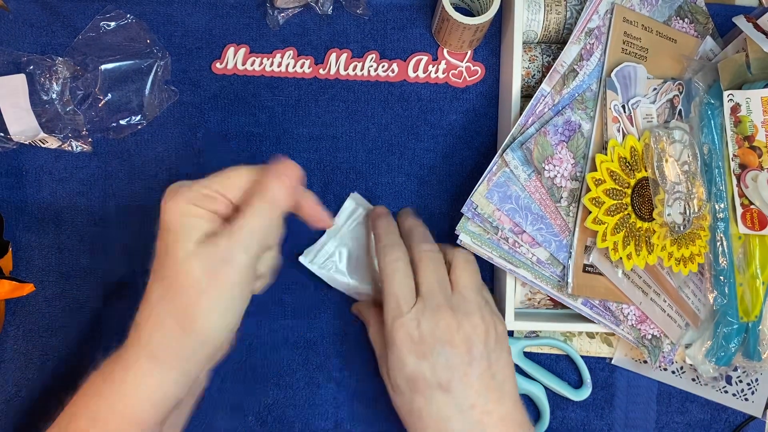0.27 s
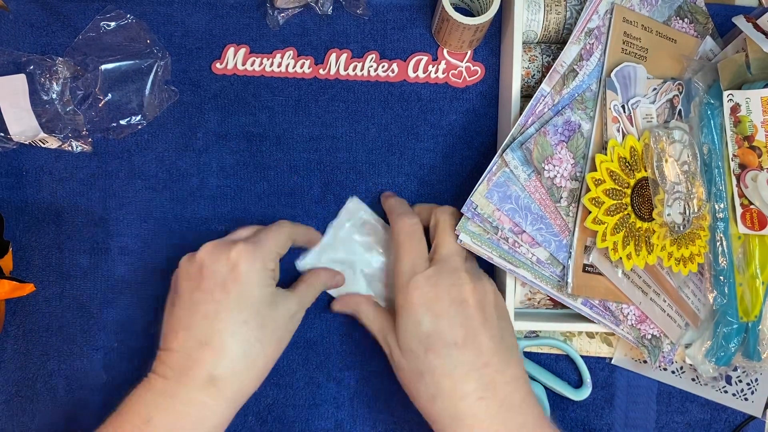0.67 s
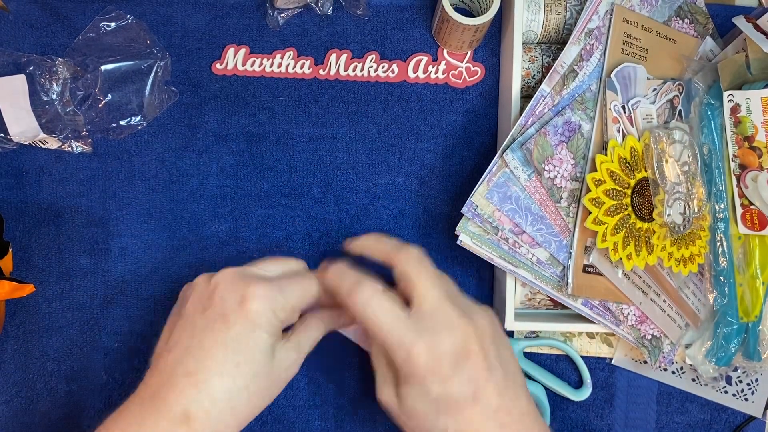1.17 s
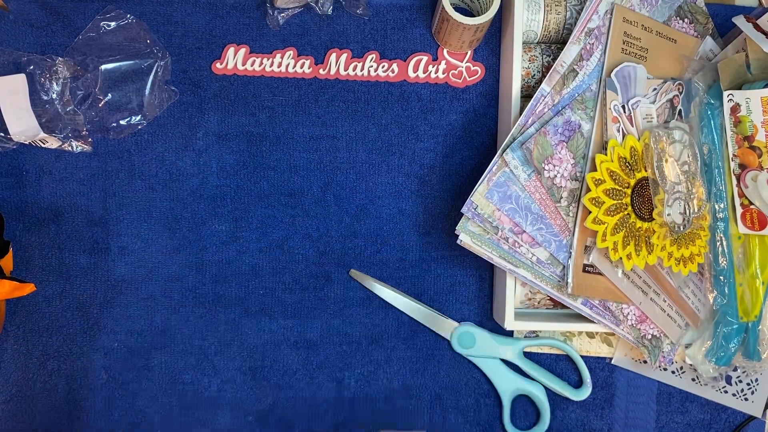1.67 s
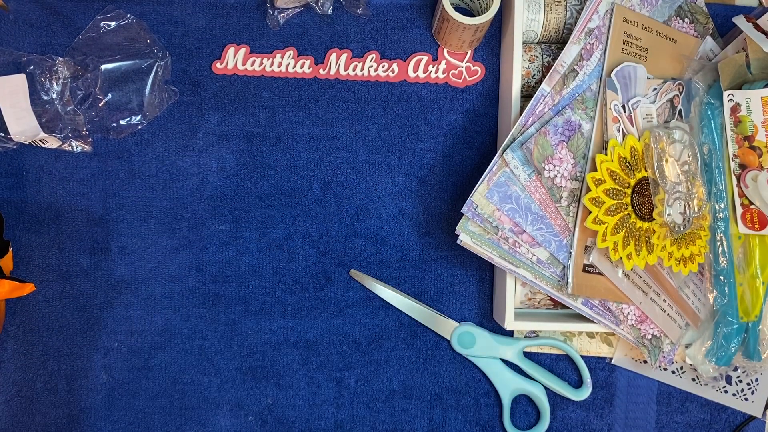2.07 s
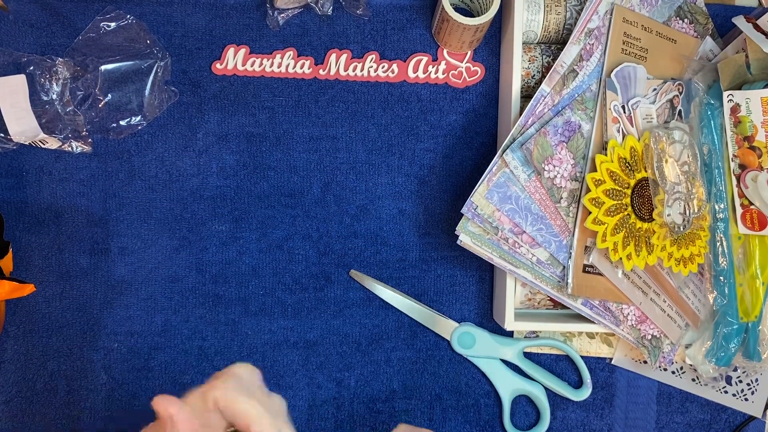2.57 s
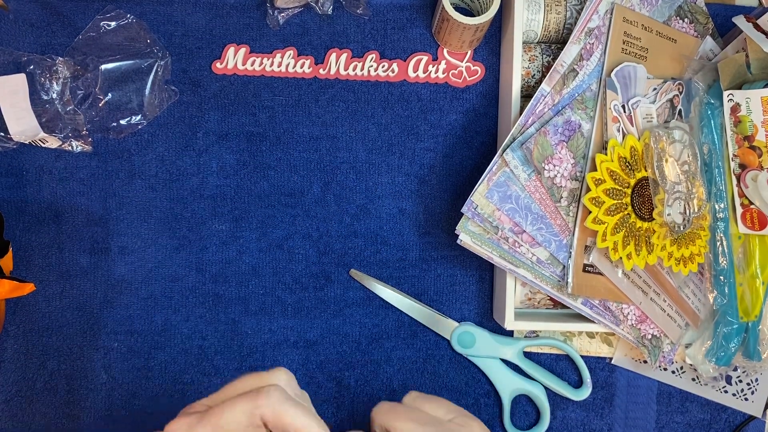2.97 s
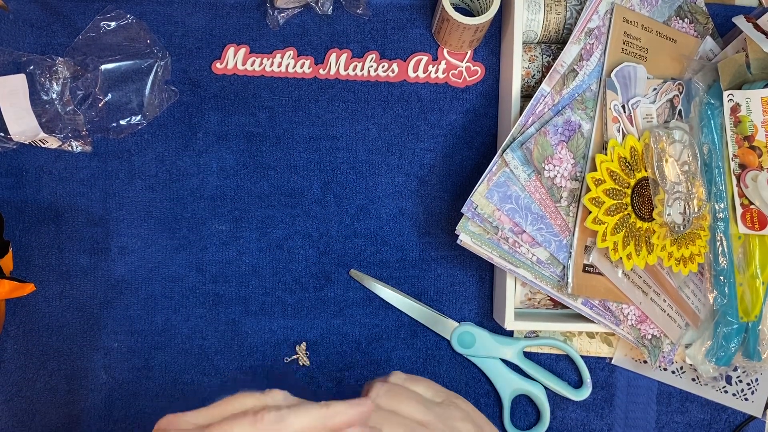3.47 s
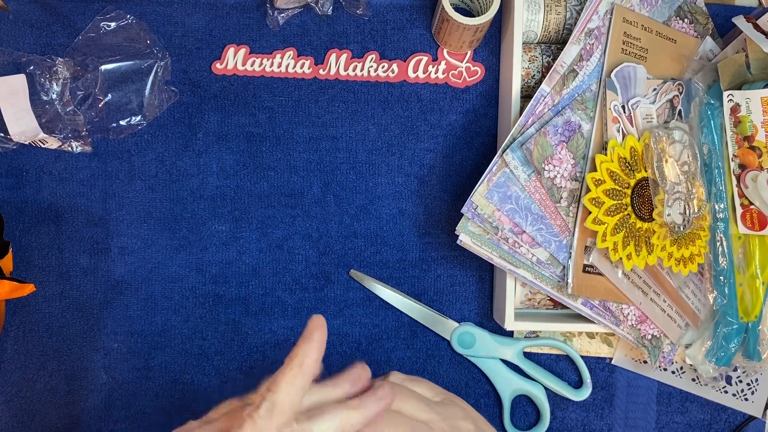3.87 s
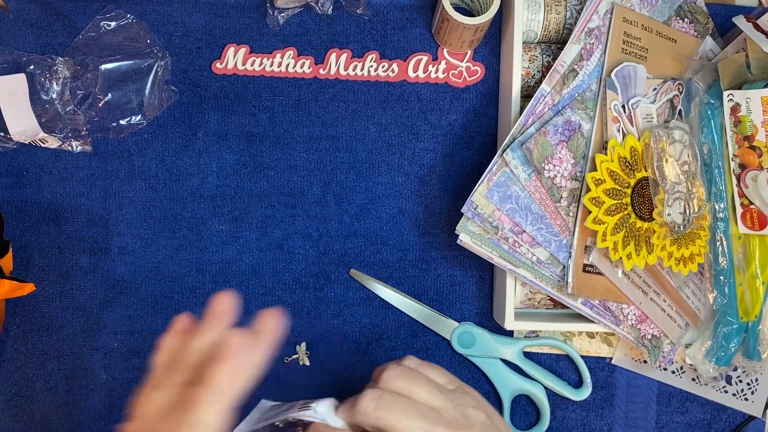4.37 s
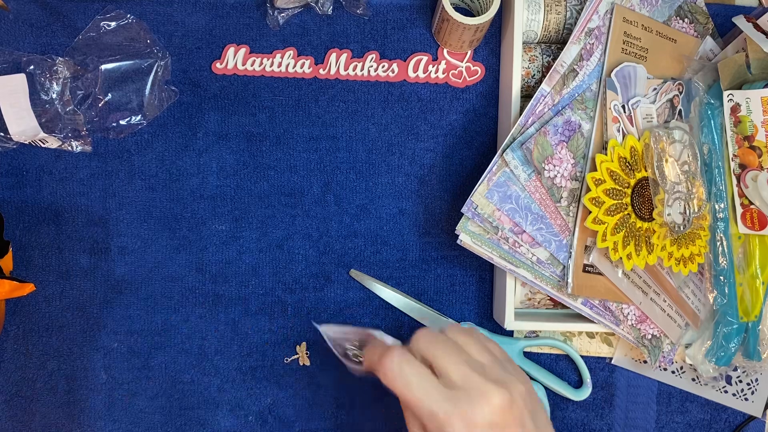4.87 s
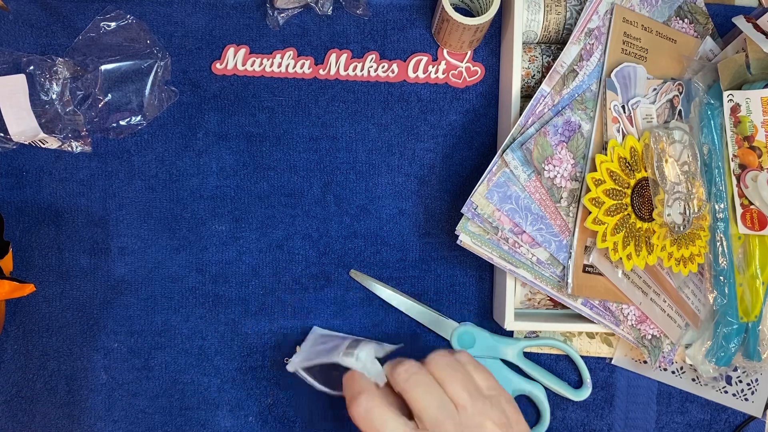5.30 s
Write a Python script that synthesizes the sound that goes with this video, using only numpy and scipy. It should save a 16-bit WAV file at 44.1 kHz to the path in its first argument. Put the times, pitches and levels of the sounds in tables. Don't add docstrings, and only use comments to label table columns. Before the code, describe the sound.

A crisp plastic packet is rubbed, folded and snapped in uneven bursts, with light knocks on a cloth-covered table. Around three seconds small metal pieces clink with a high, short ring while the bag crackles and bumps. Handling thins out, one firm snap comes just after four seconds, and soft film rustle ends it. Very close and dry, with quiet appliance hum and airy room noise beneath.

```python
import sys
import numpy as np
from scipy import signal
from scipy.fft import rfft, irfft, next_fast_len
from scipy.io import wavfile
from scipy.ndimage import uniform_filter1d, minimum_filter1d, map_coordinates

SR = 44100
rng = np.random.default_rng(int(sys.argv[2]) if len(sys.argv) > 2 else 0)


def master(y):
    cut = np.clip(np.atleast_2d(y).T, -1, 1)
    pcm = np.round(cut * 32767)
    wavfile.write(sys.argv[1], SR, pcm.astype(np.int16))


def voltage_ratio(decibels):
    exponent = np.asarray(decibels, float) / 20
    return 10 ** exponent


N = 244314

# f/Hz, level/dB
FILM = [(700, -44.5), (1200, -7), (2100, -1), (3200, -4.5), (5000, -2), (6200, -2), (7500, -7.5),
        (9000, -29)]
# f/Hz, level/dB
SIZZLE = [(5500, -48), (7000, 3.5), (9600, 0.5), (11500, -3.5), (13500, -2), (15700, -4.5), (17000, -10)]
# f/Hz, level/dB
TABLE = [(120, -23.5), (250, -6.5), (400, 2), (600, -2.5), (900, -2), (1400, -26), (2500, -32)]
# f/Hz, level/dB, width/Hz, drift/(dB/s)
HUM = [(58.6, -47.3, 0.069, 0.25), (120, -51.3, 0.3, -0.4), (44.2, -62, 1, -0.3), (104.5, -59.5, 1, -0.2),
       (172, -62.5, 5.3, -0.1), (240, -61.5, 3, 0.1), (415, -65.5, 26, -0.06), (1174, -73.5, 12, -0.2),
       (117.1, -63, .3, 0.1)]
# f/Hz, spectral level/dB
AIR = [(25, -33), (45, -4.5), (90, -5), (200, -11.5), (420, -9), (700, -17), (1200, -24), (1800, -30),
       (4000, -41), (8000, -46.5), (16000, -46.5)]
# f/Hz, likeness/(0-1)
AIR_SAME = [(60, .999), (130, 0.85), (290, 0.8), (640, 0), (1400, 0.2), (3100, 0), (7000, 0.1),
            (15000, 0.9)]
# f/Hz, phase/rad
PORT_PHASE = [(40, .01), (110, .09), (500, .1), (1200, -.5), (1750, -.15), (2800, .9), (4300, .7),
              (5000, .2), (6300, 1.9), (6900, 2.9), (7600, 3.3), (10000, 6.1), (11000, 6.5), (12800, 9.2),
              (14000, 9.6), (14800, 10.5), (16500, 13)]
# f/Hz, level/dB
PORT_BALANCE = [(40, 0), (250, -.6), (650, 3.5), (1200, -1), (2000, -2), (2750, -4), (3300, .5),
                (4300, -1.5), (6000, .5), (16000, 0)]
# f/Hz, level/dB
PASS_BAND = [(30, -9), (42, 0), (15850, 0), (16050, -19), (17250, -22), (17400, -60)]
# f/Hz, T60/s
ROOM = [(200, 0.026), (1000, 0.19), (4000, 0.1), (12000, 0.05)]
# f/Hz, level/dB, T60/s, delay at the left port/samples
CHARMS = [(6600, -1, .02, 1), (7350, -3, .02, 0), (7900, -2, .015, -1), (8250, 0, .015, -1)]
# t/s, length/s, effort level/dB, sizzle over the effort/dB
STROKES = [(0, 0.094, -69.5, 12), (0.082, 0.047, -59.5, 9.5), (0.177, 0.17, -48.5, 0),
           (0.391, 0.35, -55.5, 2), (0.762, 0.048, -49.5, 2.5), (0.857, 0.11, -46, 4.5),
           (0.942, 0.47, -54.5, 3.5), (1.447, 0.081, -63, 6), (1.533, 0.12, -53, -2.5),
           (1.653, 0.12, -48.5, 1), (1.77, 0.21, -51.5, 5), (1.94, 0.12, -41.5, 4), (2.054, 0.19, -60, 7),
           (2.255, 0.068, -52, 7), (2.344, 0.064, -57.5, 1), (2.421, 0.031, -51.5, 7),
           (2.504, .11, -73.5, 2), (2.611, 0.35, -66.5, 2), (2.969, 0.27, -57.5, 10), (3.13, 0.3, -47, -4),
           (3.348, 0.088, -46, -12), (3.456, 0.032, -41.5, -2), (3.488, 0.062, -47.5, -4),
           (3.567, .01, -60, -5), (3.597, 0.13, -49, 10), (3.623, 0.089, -41, -11), (3.772, 0.19, -58, 0),
           (4.225, 0.077, -50.5, 1), (4.327, 0.16, -69, 8), (4.442, 0.05, -65.5, 16),
           (4.493, 0.051, -59, 13.5), (4.646, 0.1, -75.5, 6), (4.719, 0.057, -67.5, 9.5),
           (4.802, 0.27, -67.5, 6), (4.999, 0.044, -52.5, 3), (5.065, 0.083, -64, 7.5),
           (5.16, 0.16, -71.5, 4), (5.34, 0.19, -82, 25)]
# t/s, length/s, level/dB
SLIDES = [
    (0.046, 0.14, -64.5),
    (2.866, 0.036, -61),
    (2.972, 0.67, -61.5),
    (3.349, 0.0077, -36.5),
    (3.453, 0.28, -56.5),
    (3.643, 0.049, -46),
    (4.243, 0.0065, -39.5),
    (5.001, 0.026, -64),
]
# t/s, peak level/dB, ring f/Hz, edge level/dB
FLICKS = [(0.0346, -65, 2130, 4), (0.1236, -51.5, 5000, 1), (0.4144, -48, 2470, -16),
          (0.5717, -41, 4980, -9), (0.597, -50, 2610, -5), (1.5064, -49, 1680, -14),
          (2.5958, -61, 2290, -2), (2.8198, -59, 1640, -10), (2.8444, -61, 1990, -1),
          (2.8674, -57, 1660, -4), (2.898, -52, 1860, -9), (2.964, -52, 1660, -6), (2.973, -51, 2020, -15),
          (2.9818, -48, 1660, -7), (3.0016, -49, 1610, -15), (3.034, -43.5, 1920, -14),
          (3.0372, -41, 1770, -4), (3.046, -42, 1720, -12), (3.0679, -64, 1540, -11),
          (3.0813, -36, 1710, -19), (3.2434, -40, 1520, -3), (3.7146, -49, 2220, -13)]
# t/s, peak level/dB, ring f/Hz, edge level/dB
TICKS = [(0.3016, -26.5, 2120, -2), (0.4858, -26, 2470, -7), (.553, -33, 3500, -14),
         (0.639, -25.5, 2500, -6), (.6475, -59, 2050, -14), (0.823, -43, 5330, -2),
         (0.895, -23.5, 5400, -10), (0.9041, -26, 2280, 7.5), (0.916, -30, 2210, -8),
         (0.9637, -34.5, 5100, -1), (1.0407, -33.5, 5330, -1.5), (1.4035, -38, 2150, -6.5),
         (1.9794, -35, 4200, -24), (2.0934, -29.5, 5900, 0.5), (2.3935, -27, 4620, -3.5),
         (2.4404, -36.5, 1850, -6.5), (2.992, -42.5, 1720, -9), (3.0936, -36.5, 1820, -6),
         (3.534, -27, 3320, -13), (3.727, -64, 2350, 19.5), (3.741, -35.5, 2080, -21),
         (3.8254, -43, 2420, 2), (3.8887, -39, 2660, -9.5), (3.9335, -39, 2060, 7),
         (4.867, -51.5, 1640, -21), (5.0828, -49.5, 2480, -15)]
# t/s, peak level/dB, ring f/Hz, edge level/dB
CRACKLES = [(0.064, -54, 6000, 3.5), (0.1128, -54, 5630, 0), (0.999, -43.5, 2400, -1),
            (1.091, -45.5, 1390, -13), (1.232, -34, 4350, -31), (1.36, -46, 6270, -1.5),
            (1.3704, -45.5, 1880, -5), (1.541, -42, 3900, -31), (1.9176, -22.5, 4660, -6),
            (2.1633, -33.5, 2240, -9), (2.6227, -61, 4950, 3), (3.04, -54, 2240, 6), (3.1, -40, 1610, -26),
            (3.148, -32, 1790, -13.5), (3.205, -36.5, 2280, -13), (3.2148, -43, 1660, -7),
            (3.398, -33.5, 1570, -22), (3.456, -37, 1450, -2), (3.6762, -34.5, 2630, -6),
            (4.196, -46, 1790, -8.5), (4.421, -65, 6150, 18), (4.8227, -65, 1690, 1)]
# t/s, peak level/dB, ring f/Hz, edge level/dB
KNOCKS = [(0.334, -36, 2330, -11), (0.463, -46, 2380, -12), (0.6796, -26.5, 2470, -13.5),
          (0.8875, -25, 2070, -12), (1.1303, -25.5, 3950, -2), (1.1534, -39, 1710, -16),
          (1.207, -43.5, 2440, -24), (1.2388, -25.5, 5300, 0), (1.3912, -36.5, 3620, -17),
          (1.8989, -28, 4000, -7), (1.7576, -20.5, 4760, -1), (1.875, -27, 3430, -5),
          (1.9405, -17.5, 5100, 2), (1.9538, -20.5, 2260, -16), (2.04, -25, 2160, -11.5),
          (3.604, -21, 5030, -12), (3.6885, -49, 4800, -2),]
# t/s, peak level/dB, ring f/Hz, edge level/dB
SLUMPS = [(.778, -44, 2480, -6), (0.9899, -35.5, 6560, 0.5), (1.141, -41, 4830, -16),
          (1.2574, -35.5, 3070, -4), (1.588, -38.5, 4850, -9.5), (2.226, -34.5, 2500, -43),
          (2.91, -59, 1160, 6), (3.017, -44, 1840, -7), (3.3463, -31.5, 1370, -4),
          (3.364, -40.5, 1520, -15), (3.548, -37.5, 2390, -18), (3.615, -29.5, 1550, -6),
          (3.561, -31, 1440, -6.5), (3.848, -46, 2470, -8), (5.005, -58, 6160, 1)]
# t/s, peak level/dB, ring f/Hz, edge level/dB
THUMPS = [(1.0083, -38.5, 2220, -17), (1.4499, -40.5, 1890, -0.5), (1.7505, -33.5, 2070, -2.5),
          (1.7741, -29, 1910, -13.5), (1.9707, -22, 4430, -10), (3.27, -35.5, 2450, 0.5),
          (3.417, -29.5, 1540, -6), (3.64, -32.5, 2620, -13), (3.9659, -49, 1370, -21)]
# t/s, peak level/dB, ring f/Hz, edge level/dB
PINGS = [(0.673, -34, 2500, -14), (0.689, -34, 2430, -11), (1.6555, -21, 3320, 1),
         (1.665, -33.5, 3300, -18), (3.1416, -24, 1540, -13.5), (3.288, -25, 1550, -12)]
# t/s, peak level/dB, ring f/Hz, edge level/dB
CLACKS = [(2.0265, -17, 2150, -3), (2.297, -22, 2530, -8.5), (4.245, -26.5, 1560, -19)]
# thud level/dB, length/ms, rise/length, ring share/(0-1)
KINDS = [
    (-25.5, 1.02, 0.16, 0.3),
    (-20, 4.13, 0.24, 0.35),
    (-18.5, 1.64, 0.23, 0.32),
    (-14.5, 3.4, 0.25, 0.24),
    (-10.5, 1.92, 0.21, 0.23),
    (-23.5, 1.46, 0.89, 0.52),
    (-13.5, 1.55, 0.3, 0.47),
]
# t/s, peak level/dB, ring f/Hz, edge level/dB, length/ms
SLIPS = [(1.631, -49.5, 1860, -2, 6), (1.65, -52, 3330, -10, 0.5), (4.2469, -24.5, 2430, -10.5, 1.55),
         (1.7405, -34.5, 2500, -9.5, 0.57), (1.85, -48.5, 1815, -9, 0.97), (1.873, -35.5, 2600, -13.5, 1.2),
         (1.9226, -32.5, 2500, 2.5, 1.2), (2.2837, -38.5, 1530, -9, 2.8), (3.1291, -34, 1660, -9, 3.8),
         (3.196, -51, 1690, -2, 1.3), (3.248, -46, 1610, -10, 1.5), (3.26, -48, 1710, -15, 1.5),
         (3.328, -35, 1630, -7, 0.89), (3.356, -45, 2370, -9.5, 1.5), (3.392, -33, 2500, -16, 1.1),
         (3.435, -50.5, 4500, -1, 1.5), (3.466, -34, 1520, -8, 2.8), (3.472, -31.5, 1500, -14, 2.8),
         (3.516, -34.5, 1420, -14, 0.88), (3.526, -47, 5070, -9, 0.73), (3.589, -38, 1700, -7, 1.5),
         (3.598, -38, 2340, -1.5, 3.6), (3.611, -29.5, 1470, -11, 1.6), (3.622, -45, 1590, -1, 1.6),
         (3.63, -41, 4630, -20, 1.7), (3.668, -37, 1490, -10, 4.5), (3.706, -42.5, 1740, -8, 2),
         (3.218, -50, 1700, -7, 2.1), (4.2505, -26, 1470, -16, 2), (4.237, -44, 2310, 1, 1.7),
         (4.939, -58, 1490, -15, 5), (.505, -45, 2300, -7, 0.83), (0.635, -48, 2300, -1, 0.95),
         (0.862, -39.5, 2190, -23, 0.7), (1.028, -51, 4500, 1, 0.94), (1.148, -28.5, 1550, -21, 1.1),
         (1.2424, -43.5, 4580, 1, 2.2), (1.341, -57, 4500, -12, 0.97), (2.231, -37, 2500, -29, 2.5)]
# t/s, level/dB, f/Hz, length/ms
BUMPS = [(0.664, -56, 156, 2.6), (1.013, -46, 147, 19), (1.952, -38.5, 188, 7.6), (1.98, -33.5, 112, 3.4),
         (2.312, -49.5, 143, 18), (3.152, -47, 234, 7.1), (3.271, -27.5, 256, 2.7), (3.287, -36.5, 60, 18),
         (3.646, -32.5, 189, 4.4), (3.665, -39, 59.7, 16), (1.453, -40, 586, 2.4), (1.592, -44, 640, 4.7),
         (3.678, -36.5, 255, 4), (1.924, -32, 485, 2.5), (1.944, -33.5, 328, 2.6), (1.956, -29.5, 597, 2.2),
         (1.973, -40.5, 513, 3.8), (2.031, -35, 356, 4.1), (3.614, -35, 391, 6.1), (3.612, -35, 597, 5.2),
         (3.291, -36, 450, 3.7), (4.247, -29, 603, 2.22), (4.252, -42, 440, 3.2)]

FILLED_S, FILLED_THUD_DB, FILLED_RUB_DB = 3.12, 6, 6.5
LEAN_S = 2.7, 3.95


def evened(x):
    return x / np.sqrt(np.mean(x ** 2) + 1e-20)


def read(points, hz):
    f, value = np.transpose(points)
    return np.interp(np.log(hz + 1), np.log(f + 1), value)


def add(mix, s, sound):
    part = mix[max(round(s * SR), 0):][:len(sound)]
    part += sound[:len(part)]


def colour(x, spectrum):
    size = next_fast_len(x.shape[-1] + 512)
    gain = voltage_ratio(read(spectrum, np.fft.rfftfreq(size, 1 / SR)))
    return irfft(rfft(x, size) * gain, size)[..., :x.shape[-1]]


def resonate(x, hz, width):
    turn = np.exp(2j * np.pi * np.cumsum(hz * np.ones(len(x))) / SR)
    r = np.exp(-np.pi * width / SR)
    return 2 * (turn * signal.lfilter([1 - r], [1, -r], x / turn)).real


def hum():
    t, out = np.arange(N) / SR, np.zeros(N)
    for hz, db, width, drift_db in HUM:
        knots = rng.standard_normal((400, 2)) @ [1, 1j]
        knots = knots[:int(abs(width) * N / SR) + 3]
        wander = signal.resample(knots, N // 64 + 1).repeat(64)[:N]
        waver = 2.72 + min(width, .7) * wander
        line = evened((waver * np.exp(2j * np.pi * hz * t)).real)
        out += voltage_ratio(db + drift_db * (t - t.mean())) * line
    return out


def air():
    frames, hz = N // 256 + 5, np.fft.rfftfreq(1024, 1 / SR)
    a, b, c, d, patches = rng.standard_normal((frames, 513, 5)).T
    patches = evened(uniform_filter1d(uniform_filter1d(patches, 12, 0), 14, 1))
    same = np.clip(read(AIR_SAME, hz), -1, 1)[:, None]
    left = a + 1j * b
    right = same * left + np.sqrt(1 - same ** 2) * (c + 1j * d)
    z = np.array([left, right]) * voltage_ratio(read(AIR, hz)[:, None] + 2.4 * patches)
    return voltage_ratio(-54) * evened(signal.istft(z, nperseg=1024, noverlap=768)[1][:, :N])


def strokes(start, length, db):
    grip_s, let_go_s, rest_db = 0.0027, 0.021, -91.5
    t = np.arange(0, N, 128)[:, None] / SR - start
    swell = np.clip(1 + t / grip_s, 0, 1) ** 2
    fade = np.exp(-np.maximum(t - length, 0) / let_go_s)
    level = (swell * fade * voltage_ratio(db)).max(1) + voltage_ratio(rest_db)
    return np.interp(np.arange(N), np.arange(0, N, 128), level)


def impacts(per_s, spread_db):
    size = voltage_ratio(spread_db * np.minimum(rng.exponential(1, N), 4))
    return size * (rng.random(N) < per_s / SR)


def rustle():
    s, length, effort_db, sizzle_db = np.transpose(STROKES)
    effort = strokes(s, length, effort_db)
    clicks = impacts(400, 4.5)
    grains = np.sqrt(abs(signal.oaconvolve(clicks ** 2, np.exp(-np.arange(160) / 30))[:N]))
    flicker = voltage_ratio(2.3 * evened(uniform_filter1d(rng.standard_normal(N), 700)))
    smooth = np.clip(.42 - (20 * np.log10(effort) + 53) / 16, .42, 1)
    drive = (smooth + (1 - smooth) * evened(grains)) * flicker * rng.standard_normal(N)

    panels_hz = 1550, 2410, 2500, 4200
    panel = rng.choice(panels_hz, N // 900 + 1).repeat(900)[:N]
    pouring = abs(np.arange(N) / SR - np.mean(LEAN_S)) < np.ptp(LEAN_S) / 2
    panel = panel * np.where(pouring, 0.63, 1)
    ring_share = .38 * (1.5 - smooth)
    ring = evened(resonate(drive, panel, 260))
    film = (1 - ring_share) * evened(colour(drive, FILM)) + ring_share * ring

    rub = strokes(s, length, effort_db - 14 + FILLED_RUB_DB * (s > FILLED_S))
    sizzle = strokes(s, length, effort_db + sizzle_db) * voltage_ratio(-12)
    layers = [(effort * voltage_ratio(-2.5), film), (sizzle, colour(drive, SIZZLE)), (rub, colour(drive, TABLE))]
    return sum(gain * evened(sound) for gain, sound in layers)


def room(x, same):
    taps = np.zeros((2, SR // 3))
    at = np.arange(80, SR // 3 - 20, 20)
    at = at + rng.integers(0, 20, (2, len(at)))
    np.put_along_axis(taps, at, rng.choice([-1., 1.], at.shape), 1)
    taps[1] = same * taps[0] + np.sqrt(1 - min(same, 1) ** 2) * taps[1]
    hz, t, z = signal.stft(taps, SR, nperseg=128)
    decay = voltage_ratio(-60 * t / read(ROOM, hz)[:, None])
    tail = signal.istft(z * decay, SR, nperseg=128)[1]
    return signal.fftconvolve(x[None], tail / np.linalg.norm(tail[0]), axes=1)[:, :N]


def snap(row, chance):
    s, peak_db, ring_hz, thud_db, edge_db, ms, rise, ring_share = row
    width_hz, lead_ms = 400, 10
    ms, rise = np.clip(ms, .6, 15), np.clip(rise, .05, 1)
    ring_share = np.clip(ring_share + max(-33 - peak_db, 0) / 60, 0, .8)

    t = np.arange(chance.shape[1]) / SR * 1000 - lead_ms
    creep = voltage_ratio(-17) * np.exp(-abs(t) / ms)
    t = np.maximum(t, 0)
    shape = creep + (1 - np.exp(-(t / (rise * ms)) ** 2)) * np.exp(-t / ms)
    slipping = shape * (.75 + uniform_filter1d(chance[3], 24) ** 2 * 6)

    force = slipping * chance[0]
    film = evened(resonate(colour(force, FILM), ring_hz, 6900))
    ring = evened(resonate(resonate(force, ring_hz, width_hz), ring_hz, 4 * width_hz))
    body = (1 - ring_share) * film + ring_share * ring
    edge = evened(colour(slipping * chance[1], SIZZLE))
    push = t * np.exp(-t / (ms * 1.32))
    thud = evened(colour(push * chance[2], TABLE))
    sound = body + voltage_ratio(edge_db) * edge + voltage_ratio(thud_db + 2.5) * thud
    level = voltage_ratio(peak_db + 1.5) * np.sqrt(ms * SR / 1000 / len(t))
    return s - .0004 - lead_ms / 1000, level * sound


def buckle(rows):
    snaps = np.zeros(N)
    for row, chance in zip(rows, rng.standard_normal((len(rows), 4, 2048))):
        add(snaps, *snap(row, chance))
    return snaps


def flicks():
    thud_db, ms, rise, ring_share = -20, 0.71, 0.53, 0.23
    out = np.zeros((2, N))
    lags = rng.integers(-3, 4, len(FLICKS)) / SR
    chances = rng.standard_normal((len(FLICKS), 4, 1024))
    for (s, db, hz, edge_db), chance, lag in zip(FLICKS, chances, lags):
        at, sound = snap((s, db, hz, thud_db, edge_db + 3, ms, rise, ring_share), chance)
        add(out[0], at + lag, sound)
        add(out[1], at, sound)
    return out


def charms(snaps):
    level_db = 20 * np.log10(strokes(*np.transpose(SLIDES)))
    loose = np.clip((level_db + 75) / 10, 0, 1)
    ticks = impacts(600, 3.5)
    piece = rng.integers(0, len(CHARMS), N)
    jingle, jolts = np.zeros((2, 2, N))
    for k, (hz, mode_db, t60, late) in enumerate(CHARMS):
        swap = 1 + .02 * rng.uniform(-0.59, 1, N // 1200 + 1).repeat(1200)[:N]
        width = np.log(1000) / np.pi / t60
        ring = evened(resonate(ticks * (piece == k), hz * swap, width))
        jolt = resonate(snaps * loose, hz * swap, width)
        jingle += voltage_ratio(mode_db) * np.array([np.roll(ring, late), ring])
        jolts += voltage_ratio(mode_db) * np.array([np.roll(jolt, late), jolt])
    return voltage_ratio(level_db - 1.5) * evened(jingle) + voltage_ratio(3) * jolts


def creases():
    rows = []
    tables = TICKS, CRACKLES, KNOCKS, SLUMPS, THUMPS, PINGS, CLACKS
    for table, (thud_db, *kind) in zip(tables, KINDS):
        for s, db, hz, edge_db in table:
            rows.append((s, db, hz, thud_db + FILLED_THUD_DB * (s > FILLED_S), edge_db, *kind))
    return buckle(rows)


def slips():
    thud_db, rise, ring_share = -13.5, 0.98, 0.6
    return buckle([(s, db, hz, thud_db, edge_db, ms, rise, ring_share) for s, db, hz, edge_db, ms in SLIPS])


def bump(s, db, hz, ms):
    t = np.arange(SR // 6) / SR
    x = t * 1000 / ms
    return s - ms / 1000, voltage_ratio(db + 4.5) * x * np.exp(-x) * np.sin(2 * np.pi * hz * t)


def lean(bag):
    lean_us, sway_us = 2, 11
    t = np.arange(N) / SR
    aside = uniform_filter1d(1. * (t > LEAN_S[0]) * (t < LEAN_S[1]), size=2000)
    sway = uniform_filter1d(uniform_filter1d(rng.standard_normal(N), size=250), size=250)
    late = aside * (lean_us + sway_us * evened(sway)) * SR / 1e6
    return np.array([map_coordinates(bag, [np.arange(N) - late], order=5), bag])


def scene():
    background = hum() + air()
    snaps = creases()
    bag = snaps + rustle() + slips()
    pieces = charms(snaps)
    table = np.zeros(N)
    for row in BUMPS:
        add(table, *bump(*row))
    reflections = voltage_ratio(-10.5) * room(bag + pieces[1], same=0.18)
    return background + lean(bag) + flicks() + pieces + reflections + table


def tiles(power):
    bins, steps = power.shape[1:]
    wide = np.pad(power, ((0, 0), (0, -bins % 8), (4, -(steps + 4) % 8)), "edge")
    mean = wide.reshape(2, wide.shape[1] // 8, 8, -1, 8).mean((2, 4))
    return mean.repeat(8, 1).repeat(8, 2)[:, :bins, 4:steps + 4]


def starve(ports):
    from_hz, under_db, quiet_db, masked_db, attack_db, busy_db = 5500, 4.5, -104.5, 44, 11, 7
    pair = np.array([ports[0] + ports[1], ports[0] - ports[1]]) / 2
    hz, t, z = signal.stft(pair, SR, nperseg=512, noverlap=384)
    power_db = 10 * np.log10(tiles(abs(z) ** 2) + 1e-20)
    treble_db = 10 * np.log10((abs(z[:, hz > 1000]) ** 2).sum((0, 1)) + 1e-20)
    rise_db = treble_db - minimum_filter1d(treble_db, 3, origin=1)
    steady = rise_db < attack_db
    busy = tiles(np.ones((2, 8, 1)) * (rise_db > busy_db))[0, 0] > 0
    busy &= (t > LEAN_S[0]) & (t < LEAN_S[1])

    near_db = -minimum_filter1d(-treble_db, 9)
    masker_db = np.where(busy, near_db + 3, uniform_filter1d(treble_db, 9))
    masked = power_db < masker_db - masked_db
    coming_db = -minimum_filter1d(-treble_db, 5, origin=-2)
    masked |= (coming_db > treble_db + attack_db) & (power_db < coming_db - masked_db - 3)

    budget_db = 2.2 * rng.standard_normal(z.shape[2] // 8 + 2).repeat(8)[4:z.shape[2] + 4]
    power_db, partner_db = power_db + budget_db, power_db[::-1]
    under = (power_db < partner_db - under_db) & ~busy
    spare = ((under | masked) & steady) | (power_db < quiet_db)
    kept = z * ~(spare & (hz > from_hz)[:, None])
    mid, side = signal.istft(kept, SR, nperseg=512, noverlap=384)[1][:, :N]
    return np.array([mid + side, mid - side])


def top_cut(x):
    return signal.sosfilt(signal.butter(12, 17320, fs=SR, output="sos"), x)


def record(dry):
    size = next_fast_len(N + 1024)
    hz = np.fft.rfftfreq(size, 1 / SR)
    half = voltage_ratio(read(PORT_BALANCE, hz) / 2) * np.exp(.5j * read(PORT_PHASE, hz))
    response = np.array([half, 1 / half]) * voltage_ratio(read(PASS_BAND, hz))
    ports = irfft(rfft(dry, size) * response, size)[:, :N]
    mix = starve(ports)
    return top_cut(mix)


dry = scene()
out = record(dry)
master(out)
```